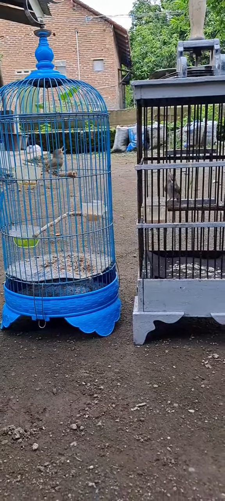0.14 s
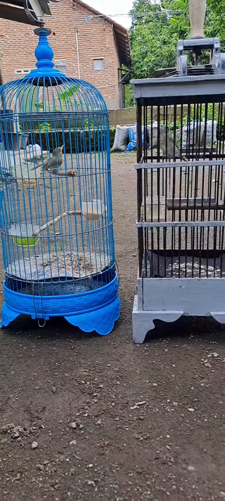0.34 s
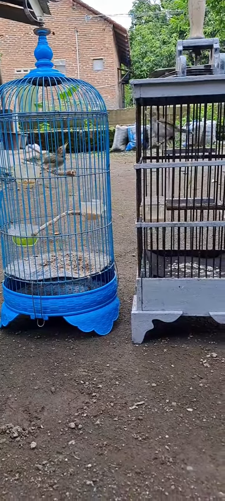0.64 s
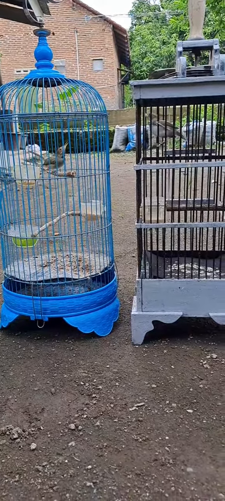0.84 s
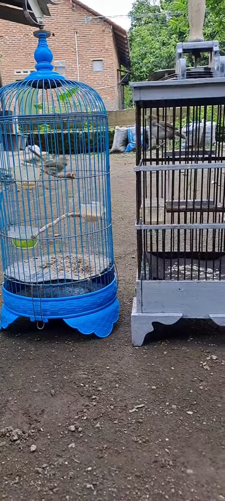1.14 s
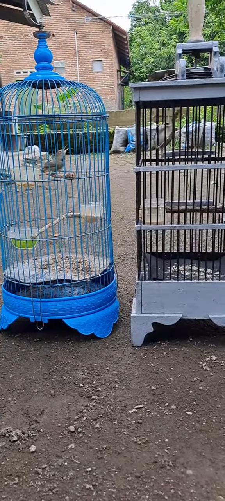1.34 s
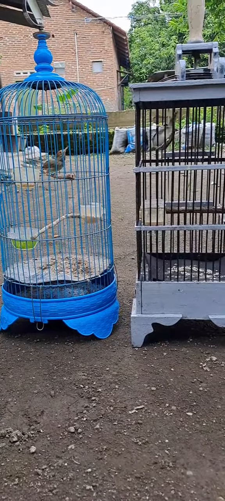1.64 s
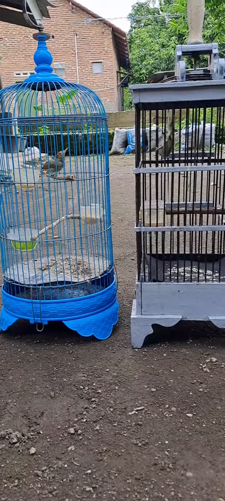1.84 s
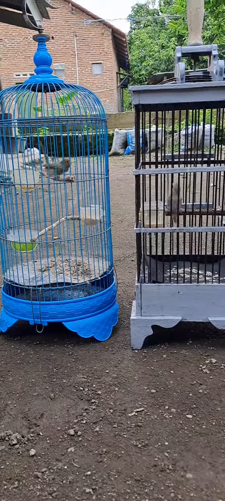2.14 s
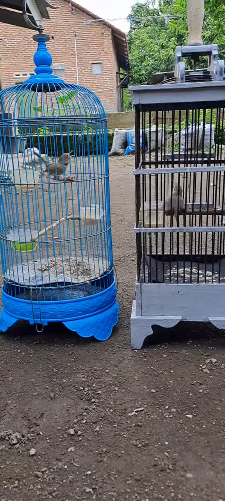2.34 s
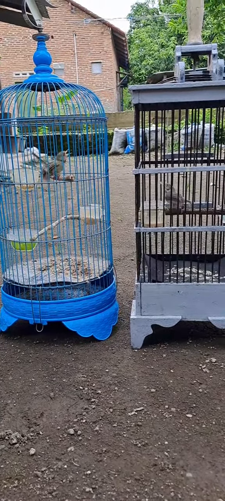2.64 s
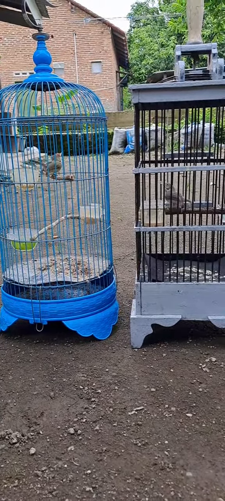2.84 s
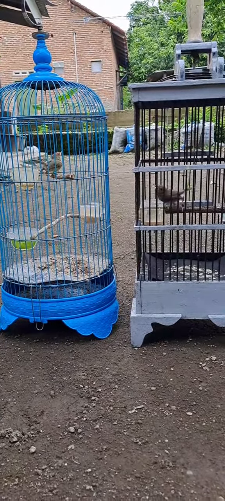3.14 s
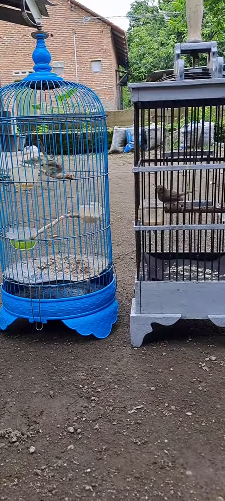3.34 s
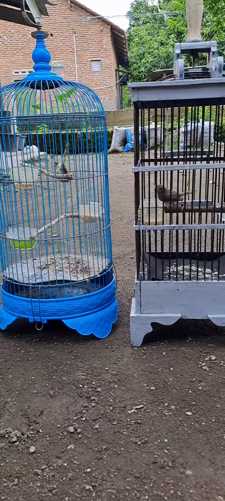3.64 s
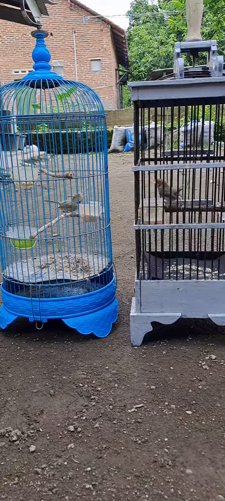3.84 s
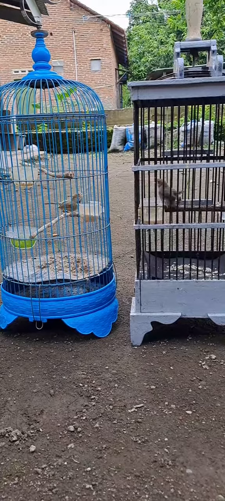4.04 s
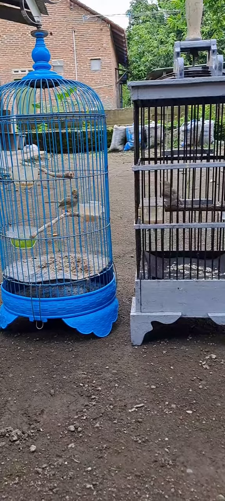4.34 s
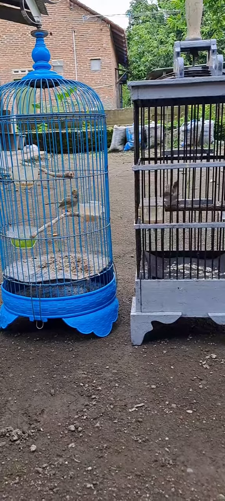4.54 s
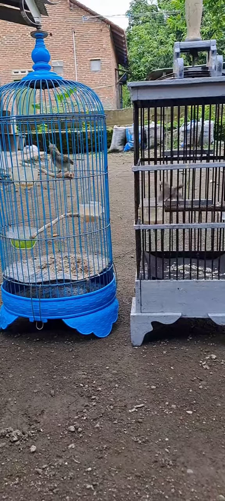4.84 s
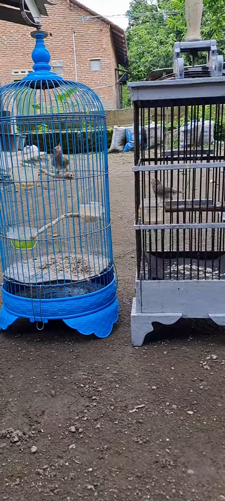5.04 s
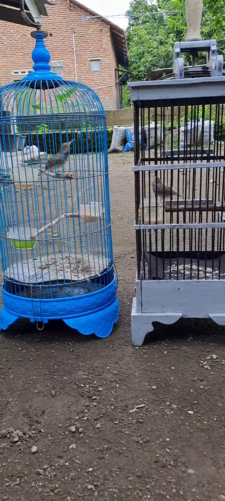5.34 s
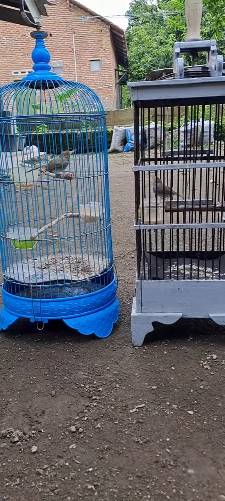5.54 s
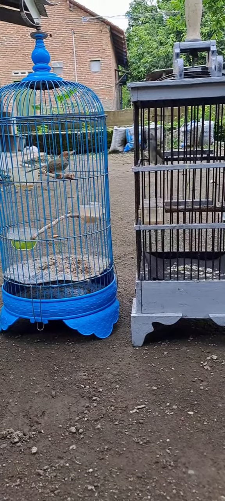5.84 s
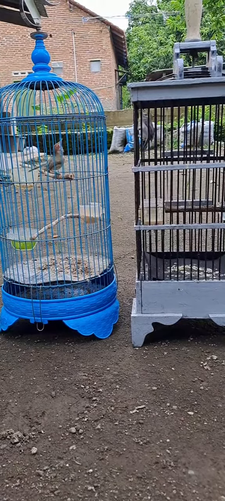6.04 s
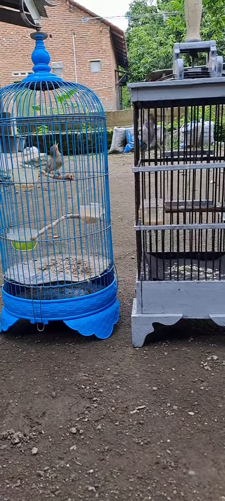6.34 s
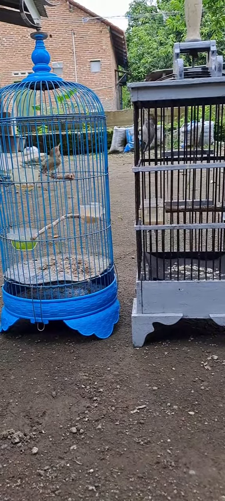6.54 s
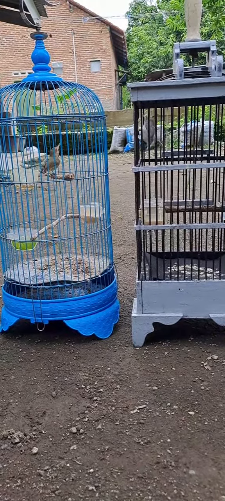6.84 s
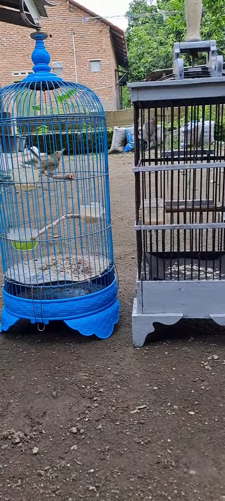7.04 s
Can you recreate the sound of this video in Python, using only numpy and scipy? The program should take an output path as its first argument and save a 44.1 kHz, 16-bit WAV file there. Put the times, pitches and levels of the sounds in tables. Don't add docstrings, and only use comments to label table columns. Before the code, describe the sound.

Small caged songbirds sing loudly over one another in a walled yard, picked up by a nearby phone. A held whistle around 3.5 kHz is already sounding at the start, closing at 0.2 s with a high pip and fast falling note. The same phrase returns at about 1.2, 2.4, 3.9, 5.0 and 6.1 s, each striking hard, dipping, then swelling. A short, dim trill runs from 0.5 s; longer bright trills from 1.8 and 4.3 s, and weaker, slowing ones from 5.4 and 6.6 s. Steep up-and-down chirps cut in near 0.7, 2.0-2.6, 4.1-4.5, 5.3 and 6.4 s. Breathy farther notes appear mainly before 3.4 s. Tiny dry wing snaps mark hops, notably around 3.1-3.8 and 6 s. A far dove hoots faintly near 0.3, 1.5 and 2.6 s. Soft low traffic rumble continues, with short wall echoes.

```python
import sys
import numpy as np
from scipy import signal
from scipy.fft import rfft, irfft
from scipy.io import wavfile
from scipy.ndimage import uniform_filter1d, map_coordinates

SR = 44100
rng = np.random.default_rng(int(sys.argv[2]) if len(sys.argv) > 2 else 0)


def boost(x):
    u = np.asarray(x, float) / 20
    return 10 ** u


def materialize(psi):
    bounded = np.clip(np.atleast_2d(psi).T, -1, 1)
    quanta = np.round(bounded * 32767).astype(np.int16)
    wavfile.write(sys.argv[1], SR, quanta)


N = 317079

# (start [s], length [s], strike [dB], dip [dB], swell [dB])
WHISTLES = [(-.140, 0.284, -12, -28.5, -22.5), (1.245, 0.29, -11.5, -30, -18.5),
            (2.376, 0.31, -7.5, -28.5, -19), (3.874, .300, -10.5, -31.5, -18.5),
            (4.953, .291, -6.5, -25.5, -16), (6.134, 0.31, -9.5, -35, -23.5)]
# (share of length [1], frequency [Hz])
WHISTLE_PITCH = [(0, 3610), (0.028, 3667), (0.098, 3436), (.33, 3404), (.6, 3439), (.9, 3480), (.96, 3532),
                 (1, 3566)]
# (time from its start [s], frequency [Hz], level re its start [dB])
WHISTLE_SCOOP = [(-.016, 1709, -37), (-.010, 2515, -21), (-.005, 3197, -12.5)]
HALF_LINE_FADES = (.04, .14, .62, .9)
# (time [s], pip level [dB], fall level [dB], left minus right [dB])
PHRASE_CLOSES = [(0.205, -12, -8, -2.6), (1.603, -9.5, -6.5, -1.2), (2.7495, -12, -7, 0.5),
                 (4.231, -14.5, -7, 1.8), (5.305, -15, -7, -2.5), (6.501, -12.5, -7.5, 0)]
# (time [s], frequency [Hz], level [dB])
PIP_SHAPE = [(0, 4900, -18), (.003, 5000, 2), (.008, 5130, 3.5), (.016, 5140, -7.5), (0.0208, 5140, -13),
             (.023, 5130, -39.5)]
# (time [s], frequency [Hz], level [dB])
FALL_SHAPE = [(-.002, 4550, -21), (.003, 4250, -7.5), (.008, 3900, -3), (.016, 3600, -5), (.024, 3305, -11),
              (0.034, 2700, -15.5), (.046, 2115, -23), (0.049, 1776, -35.5)]
# (frequency [Hz], density [dB per Hz])
RUMBLE_SPECTRUM = [(13, -45.5), (22, -20.5), (64, 3), (108, -3.5), (144, 1.5), (176, -4.5), (310, -19),
                   (451, -22), (500, -20.5), (593, -27.5), (715, -19), (893, -27.5), (1060, -34.5),
                   (1300, -58), (1690, -64.5), (2860, -120)]
# (time [s], level [dB])
TRAFFIC_LEVEL = [(0.0, -46.5), (3.44, -46), (3.56, -51), (3.66, -47.5), (5.23, -45), (7.19, -46)]
# (frequency [Hz], density [dB per Hz])
AIR_SPECTRUM = [(800, -22), (1200, -9), (2000, -7.5), (3500, -15.5), (6000, -13), (8000, -20), (11000, -51)]
# (frequency [Hz], likeness [1])
EAR_LIKENESS = [(30, 0.985), (150, 1), (350, 0.93), (700, 0.67), (1500, 0.6), (8000, 0.7)]
# (time [s], rise [s], top length [s], top frequency [Hz], level [dB])
FLAT_NOTES = [(0.09, 0.046, 0.018, 4560, -31), (0.935, 0.012, 0.024, 3272, -37),
              (0.994, 0.032, 0.042, 4404, -33), (1.186, 0.042, 0.038, 4558, -31.5),
              (1.425, 0.022, 0.019, 4730, -28), (2.851, 0.029, 0.089, 4450, -38),
              (3.098, 0.03, 0.024, 4509, -33.5), (3.304, 0.029, 0.03, 4770, -34.5)]
# (start [s], length [s], start frequency [Hz], end frequency [Hz], level [dB])
DOVE_HOOTS = [
    (.27, 0.098, 727.5, 693, -51.5),
    (1.5, 0.12, 552.3, 556, -61),
    (2.59, .11, 455, 535, -52),
]
# (time [s], peak level [dB], ring frequency [Hz], left minus right [dB])
HOPS = [(0.372, -31, 5700, -3), (1.0984, -37, 4580, -6.5), (1.7918, -33.5, 5350, -9.5),
        (3.1343, -28.5, 4653, -4), (3.3388, -34.5, 4540, -7.5), (3.3634, -31, 4790, 2),
        (3.6955, -35.5, 5320, -2.5), (3.8324, -36, 5140, -1.5), (4.9751, -32, 5230, -1),
        (5.864, -52, 6360, -8), (5.9631, -34.5, 5060, -3.5), (6.0355, -36.5, 5550, -6.5),
        (7.1480, -33.5, 5750, -6.5)]
HOP_BEATS = (3, 1, 2, 2, 1, 1, 3, 2, 1, 1, 3, 2, 3)
# (first chip [s], first gap [s], growth of each next gap [s])
TRILL_BOUTS = [
    (.508, .0445, 0),
    (1.799, .0378, .00068),
    (4.321, .0378, .00092),
    (5.445, .0402, .0016),
    (6.590, .044, .002),
]
TRILL_CHIPS = (6, 13, 14, 6, 5)
# (time from the drop [s], frequency [Hz], level re crest or drop [dB])
CHIP_SHAPE = [(-.017, 3350, -30), (-.012, 3900, -8), (-.007, 4250, 0), (-.003, 4130, -3), (0, 3550, 0),
              (.002, 3000, -9), (.005, 2300, -32)]
# (time [s], hook width [1], crest [dB], drop [dB], echo gain as it turns away [dB])
TRILL_EFFORT = [(0.499, .71, -30, -35, 8.5), (.62, 0.49, -27.5, -41, 12), (0.749, .3, -47, -29.5, 11),
                (1.8, .93, -18.5, -24.5, 0), (2.0, .95, -24.5, -15, 3.5), (2.15, 0.8, -20.5, -25, 7.5),
                (2.302, .35, -34.5, -26, 10), (4.3, 0.67, -28.5, -31, 8.5), (4.452, .95, -29.5, -19, 8.5),
                (4.901, 1.25, -27, -20, 4.5), (5.438, 0.35, -41, -32.5, 11), (5.529, 0.37, -32, -28, 8),
                (5.669, .27, -37.5, -26.5, 7), (6.58, 0.37, -39.5, -21, 5), (6.8, .22, -47, -32, 10)]
# (time of top [s], top frequency [Hz], rise [dB], fall [dB], left minus right [dB])
ARCHES = [(0.6506, 5557, -8.5, -13, -2), (0.8099, 5416, -10.5, -10.5, -3), (2.034, 5350, -11.5, -12.5, -2),
          (2.198, 5320, -10, -11, -2.5), (2.364, 5325, -9.5, -11.5, -3.5), (2.550, 5400, -9.5, -14, -4),
          (4.09, 5470, -8.5, -12.5, -1), (4.254, 5267, -11.5, -11.5, -1.1), (4.452, 5330, -8.5, -19, -2.2),
          (5.226, 5403, -10, -12.5, 2), (5.385, 5355, -13.5, -20, -3), (6.339, 5614, -11.5, -13, -2.7),
          (6.494, 5390, -13, -14.5, -3)]
# (time from the top [s], share of top frequency [1], level re rise, top or fall [dB])
ARCH_SHAPE = [(-.042, .29, -38), (-.028, .485, -15), (-.017, .66, 0), (-.008, .89, -4), (-.003, 1.0, 0),
              (.003, .995, 0), (.008, .875, 2), (.015, .65, -1), (.032, .29, -41)]
# (start [s], end [s], frequency [Hz], start level [dB], end level [dB])
TREBLE_TONES = [(1.40, 1.76, 9810, -67, -80), (1.60, 2.17, 15640, -71, -72), (2.78, 2.98, 9000, -72.5, -86),
                (3.10, 3.48, 9850, -91, -102), (4.27, 4.97, 15150, -66, -70.5),
                (4.97, 5.18, 15332, -93.5, -92), (6.35, 6.80, 10690, -76.5, -90),
                (6.47, 6.82, 13953, -74, -86)]

STRIKE_S, STRIKE_LOSS_DB, DIP_S = 0.0072, 6, .05
SURGE_S, SURGE_DB, LET_GO_DB = .035, 5, 4
PIP_TO_FALL_S = .034
AIR_DB = -66.5
QUIET_DB, HUSH_DB, HUSH_S = -51, -6, 0.031
WALL_CUT_HZ = 9400
BEAT_S, LIFT_OFF_DB = .0165, -14
HOOK_CENTRE_HZ = 3420
CHIP_CHANCE_DB, CHIP_CHANCE_HZ = 1.3, 60
RASP_DB, RASP_LOSS_DB = -9, 17
TOP_LOSS_DB = 12
TOP_BIN = 92


def slow(size, rate):
    knots = rng.standard_normal(int(size * rate / SR) + 3)
    return map_coordinates(knots, [np.arange(size) * rate / SR], order=3)


def add(out, s, hz, rms_db, partials, pan_db, flutter_db, breath_db=-50., overtone_floor_hz=6600, rasp_db=-40.):
    i = np.arange(max(int(s[0] * SR), 0), min(int(s[-1] * SR), N))
    pitch = np.interp(i / SR, s, hz)
    phase = 2 * np.pi * (np.cumsum(pitch) / SR + rng.random())
    tone = np.zeros(len(i))
    for k, db in partials:
        escape = np.clip(1 if k < 2 else (k * pitch - overtone_floor_hz) / 900, 0, 1)
        tone += boost(db) * np.sin(k * phase) * (k * pitch < .45 * SR) * escape
    tone = tone * (1 + boost(rasp_db) * slow(len(i), 3400))
    breath = np.diff(rng.standard_normal(len(i) + 1))
    tone = np.sqrt(2) * tone + boost(breath_db) * breath
    tone = tone * boost(np.interp(i / SR, s, rms_db) + flutter_db * slow(len(i), 168.7))
    tone = tone * signal.windows.tukey(len(i), min(1, 180 / len(i)))
    out[:, i] += tone * boost(np.array([[pan_db / 2], [-pan_db / 2]]))


def yard(x, ground_db, wall_db, near_db, near_t60, far_db, far_t60, send=1):
    t = np.arange(SR) / SR
    near = boost(near_db - 60 * t / near_t60) * np.clip(t / .016, 0, 1)
    far = boost(far_db - 60 * t / far_t60) * np.clip(t / .03, 0, 1)
    shared, own = rng.standard_normal(SR), rng.standard_normal((2, SR))
    echo = (.55 * shared + 1.2 * own) * np.hypot(near, far)
    echo = echo * boost(2.5 * slow(SR, 220) - .5)
    echo[:, int(.0031 * SR)] += boost(ground_db)
    echo[:, int(.026 * SR)] += boost(wall_db)
    echo = signal.sosfilt(signal.butter(1, WALL_CUT_HZ, fs=SR, output="sos"), echo)
    sent = np.tile(send * x.mean(axis=0), (2, 1))
    return x + signal.fftconvolve(sent, echo, axes=1)[:, :N]


def whistler():
    out, send = np.zeros((2, N)), np.ones(N)
    share, shape_hz = np.transpose(WHISTLE_PITCH)
    for at, length, strike_db, dip_db, swell_db in WHISTLES:
        s = np.linspace(0, length, num=80)
        hz = np.interp(s / length, share, shape_hz)
        surge_db = swell_db + SURGE_DB
        db = np.interp(s, [0, STRIKE_S, DIP_S, length - SURGE_S, length - 0.28 * SURGE_S, length],
                       [strike_db, strike_db - STRIKE_LOSS_DB, dip_db, swell_db, surge_db,
                        surge_db - LET_GO_DB])
        s = s + at
        merge_s = [s[0] + .015, s[0] + .035, s[-1] - .045, s[-1] - .02]
        send -= np.interp(np.arange(N) / SR, merge_s, [0, .8, .8, 0])
        lead_s, lead_hz, lead_db = np.transpose(np.array(WHISTLE_SCOOP) + [s[0], 0, db[0]])
        s = np.r_[lead_s, s, s[-1] + .008]
        hz = np.r_[lead_hz, hz, hz[-1]]
        db = np.r_[lead_db, db, db[-1] - 25]
        add(out, s, hz, db, [(1, -0.5), (2, -39.0), (4, -55.5)], pan_db=2.5, flutter_db=1.68, breath_db=-61.0)
        fade_db = np.interp((s - at) / length, HALF_LINE_FADES, [-30, 0, 0, -30])
        add(out, s, hz, db + fade_db, [(.5, -39.0), (1.5, -27.5), (2.5, -55.5)], pan_db=1.0,
            flutter_db=2.2, breath_db=-93)
    for at, pip_db, fall_db, pan_db in PHRASE_CLOSES:
        s, hz, db = np.transpose(PIP_SHAPE)
        add(out, at + s, hz, db + pip_db, [(1, -3.5), (2, -44.5), (3, -51.5)], pan_db,
            flutter_db=-1.5, breath_db=-50.0)
        s, hz, db = np.transpose(FALL_SHAPE)
        add(out, at + PIP_TO_FALL_S + s, hz, db + fall_db, [(1, 1), (2, -33.0), (3, -54.0), (4, -42.0)],
            pan_db, flutter_db=3.0, breath_db=-54.5, rasp_db=-27.5)
    return yard(out, ground_db=-22.5, wall_db=-19.5, near_db=-32.5, near_t60=0.2,
                far_db=-52.5, far_t60=0.54, send=send)


def background(spectrum, level_db):
    log_hz = np.log(np.maximum(np.fft.rfftfreq(N, 1 / SR), 1))

    def curve(table):
        hz, value = np.transpose(table)
        return np.interp(log_hz, np.log(hz), value)

    alike = np.clip(curve(EAR_LIKENESS), 0, 1)
    mid, side = rfft(rng.standard_normal((2, N))) * boost(curve(spectrum))
    x = irfft(np.sqrt(1 + alike) * mid + np.sqrt(1 - alike) * side * [[1], [-1]], N)
    return boost(level_db) * x / np.std(x)


def farther():
    out = np.zeros((2, N))
    for at, rise, length, top_hz, level_db in FLAT_NOTES:
        s = at + np.array([-rise, -.45 * rise, -.1 * rise, .25 * length, length, length + .009, length + .024])
        hz = top_hz * np.array([.62, .78, .965, 1.01, .99, .88, .68])
        db = level_db + np.array([-24., -7., -1, 0, -2, -4., -14.])
        add(out, s, hz, db, [(1, -6), (2, -20.5), (3, -39.0)], pan_db=0.0, flutter_db=4.0,
            breath_db=-27.5, overtone_floor_hz=3000, rasp_db=-16.0)
        octave_db = [level_db - 21.5, level_db - 16.0, level_db - 28.0]
        add(out, s[:3], 2 * hz[:3], octave_db, [(0.91, 0.0035)], pan_db=1.5, flutter_db=4.0)
    return yard(out, ground_db=-8.0, wall_db=-23.0, near_db=-26.5, near_t60=0.29, far_db=-50.0, far_t60=.6)


def dove():
    out = np.zeros((2, N))
    for at, length, start_hz, end_hz, level_db in DOVE_HOOTS:
        s = at + length * np.array([0, .35, .65, 1])
        hz = np.interp(s, s[[0, -1]], [start_hz, end_hz])
        db = level_db + np.array([-14., 0, 0, -14.])
        add(out, s, hz, db, [(1, 0)], pan_db=0, flutter_db=0, breath_db=-90)
    return out


def wings():
    out, t = np.zeros((2, N)), np.arange(300) / SR
    snaps = []
    for (s, db, hz, pan), beats in zip(HOPS, HOP_BEATS):
        for k in range(beats):
            snaps.append((s + BEAT_S * k, db + LIFT_OFF_DB * (k < beats - 2), hz, pan))
    ticks = rng.standard_normal((len(snaps), 300))
    band = signal.butter(2, [1400, 8600], "band", fs=SR, output="sos")
    for (at, peak_db, ring_hz, pan_db), tick in zip(snaps, ticks):
        tick = signal.sosfilt(band, tick) * np.exp(-t / 0.00086)
        ring = np.sin(2 * np.pi * ring_hz * t) * t / .00022 * np.exp(1 - t / .00022)
        gain = boost(peak_db + np.array([[pan_db / 2], [-pan_db / 2]]))
        i = round(at * SR)
        out[:, i:i + 300] += (gain * (1.72 * ring + 1.0 * tick))[:, :N - i]
    return yard(out, ground_db=-2.0, wall_db=-28.5, near_db=-27.5, near_t60=0.23, far_db=-52.0, far_t60=0.89)


def triller():
    out, (s, hz, db) = np.zeros((2, N)), np.transpose(CHIP_SHAPE)
    when, *controls, away_db = np.transpose(TRILL_EFFORT)
    for (first, gap, slowing), chips in zip(TRILL_BOUTS, TRILL_CHIPS):
        k = np.arange(chips)
        for at in first + gap * k + slowing * k * (k - 1) / 2:
            wide, crest_db, drop_db = (np.interp(at, when, c) for c in controls)
            hook_hz = HOOK_CENTRE_HZ + (hz - HOOK_CENTRE_HZ) * wide
            hook_hz = hook_hz + CHIP_CHANCE_HZ * rng.standard_normal()
            crest_db, drop_db = [crest_db, drop_db] + CHIP_CHANCE_DB * rng.standard_normal(2)
            hook_db = db + np.where(s < 0, crest_db, drop_db)
            add(out, at + s / np.clip(wide, .3, 1) ** 0.58, hook_hz, hook_db,
                [(1, -2.5), (2, -32.0), (3, -50.5), (4, -54.5)], pan_db=-0.2, flutter_db=3.0,
                breath_db=-38.5, rasp_db=RASP_DB - RASP_LOSS_DB * wide)
    send = boost(np.interp(np.arange(N) / SR, when, away_db))
    return yard(out, ground_db=-14., wall_db=-23., near_db=-32.5, near_t60=.22,
                far_db=-52., far_t60=.45, send=send)


def archer():
    out, (s, share, db) = np.zeros((2, N)), np.transpose(ARCH_SHAPE)
    for at, top_hz, rise_db, fall_db, pan_db in ARCHES:
        top_db = (rise_db + fall_db) / 2 - TOP_LOSS_DB
        effort_db = np.interp(s, [-0.0095, -0.003, 0.01, 0.0092], [rise_db, top_db, top_db, fall_db])
        add(out, at + s, top_hz * share, db + effort_db, [(1, -2), (2, -35.5), (3, -42.5), (4, -43.0)],
            pan_db, flutter_db=2.4, rasp_db=-32.0)
    return yard(out, ground_db=-12., wall_db=-14., near_db=-33., near_t60=.24, far_db=-50., far_t60=.55)


def copied_treble(x, hiss, limit_db, mute_db, seam_db):
    z = signal.stft(x, nperseg=256, noverlap=192)[2]
    frames = z.shape[2] // 16 * 16
    copy = np.concatenate([z[:, 8:36, :frames], z[:, 12:40, :frames]], axis=1)

    def tiles(v):
        return v.reshape(2, 8, 7, -1, 16)

    def power(v):
        return np.mean(np.abs(tiles(v)) ** 2, axis=(2, 4), keepdims=True) + 1e-20

    want, have = power(z[:, 40:96, :frames]), power(copy)
    gain = np.minimum(want / have, boost(2 * limit_db))
    gain = gain * (want > boost(2 * mute_db))
    noise = rng.standard_normal(copy.shape) + 1j * rng.standard_normal(copy.shape)
    fill = np.sqrt(gain) * (tiles(copy) + hiss * np.sqrt(have) * tiles(noise))
    z[:, 40:] = 0
    z[:, 40:96, :frames] = fill.reshape(copy.shape)
    z[:, TOP_BIN:] = 0
    z[:, 65:70] *= boost(seam_db)
    return signal.istft(z, nperseg=256, noverlap=192)[1][:, :N]


def treble_tones():
    out = np.zeros((2, N))
    for start, end, hz, start_db, end_db in TREBLE_TONES:
        add(out, [start, end], [hz, hz], [start_db, end_db], [(1, 0)], pan_db=0, flutter_db=1.5, breath_db=-90)
    return out


def scene():
    birds = whistler() + farther() + wings() + triller() + archer()
    traffic_db = np.interp(np.arange(N) / SR, *np.transpose(TRAFFIC_LEVEL))
    rumble = background(RUMBLE_SPECTRUM, 0) * boost(traffic_db)
    bird_power = np.abs(uniform_filter1d(birds[0] ** 2, int(HUSH_S * SR)))
    loud_db = 10 * np.log10(bird_power + 1e-12)
    hush = boost(HUSH_DB * np.clip((QUIET_DB - loud_db) / 10, 0, 1))
    return birds + dove() + rumble + hush * background(AIR_SPECTRUM, AIR_DB)


def top_cut(x):
    return signal.sosfilt(signal.butter(12, 16250, fs=SR, output="sos"), x)


def record(dry):
    rounded = 1.4 * np.tanh(dry / 1.4)
    thrifty = copied_treble(rounded, hiss=.9, limit_db=15.5, mute_db=-101., seam_db=-17.5)
    return top_cut(thrifty + treble_tones())


dry = scene()
out = record(dry)
materialize(out)
```